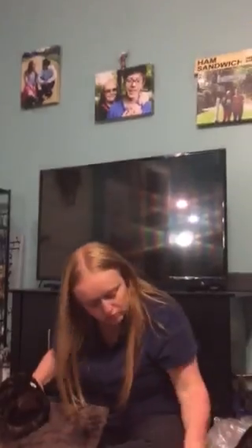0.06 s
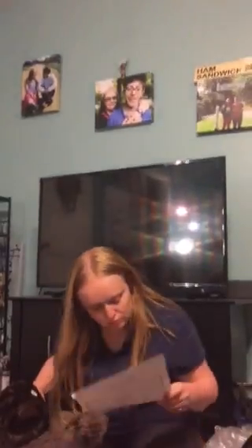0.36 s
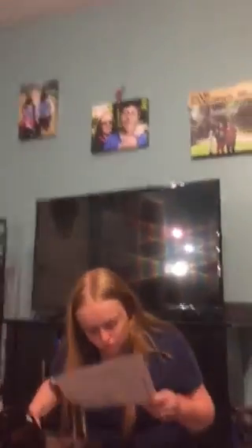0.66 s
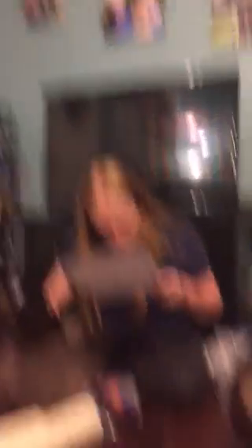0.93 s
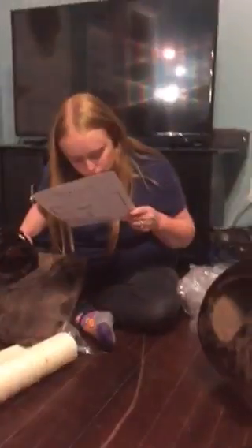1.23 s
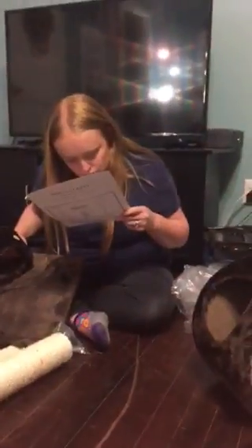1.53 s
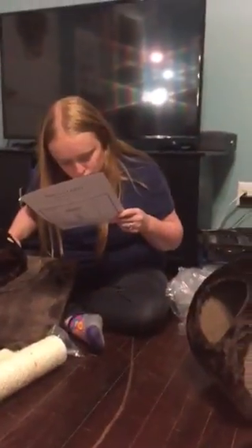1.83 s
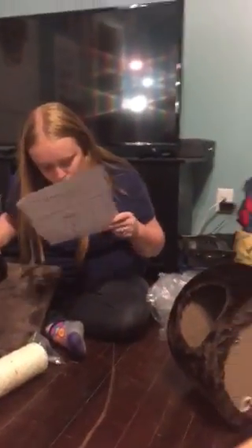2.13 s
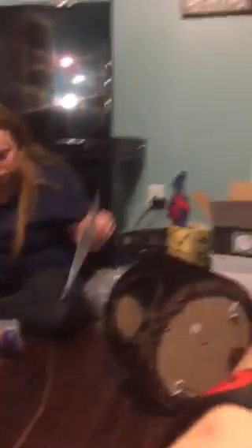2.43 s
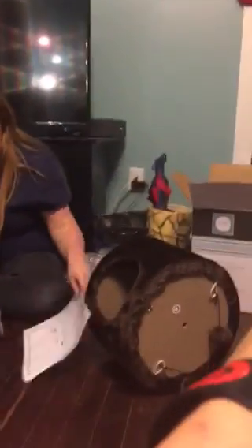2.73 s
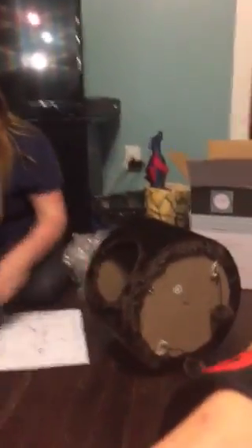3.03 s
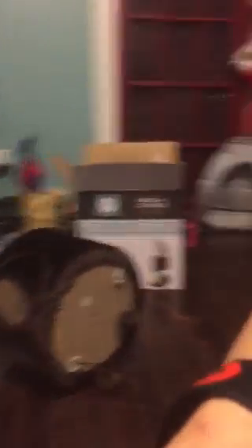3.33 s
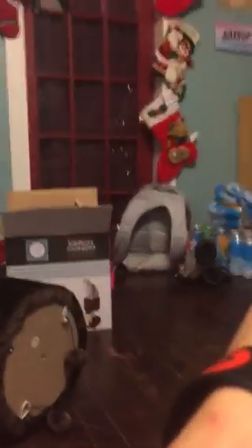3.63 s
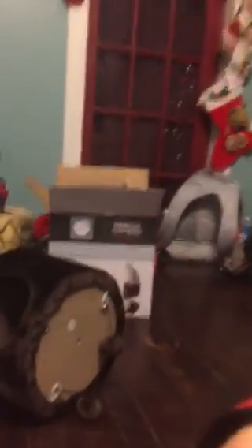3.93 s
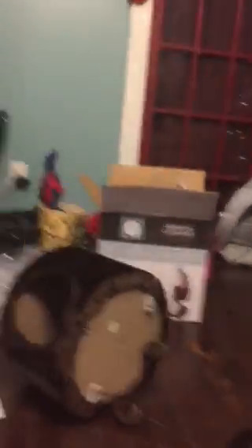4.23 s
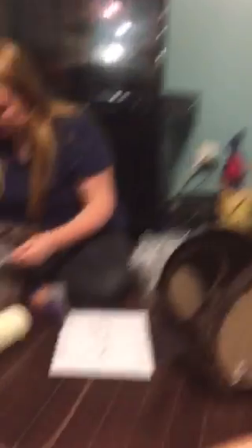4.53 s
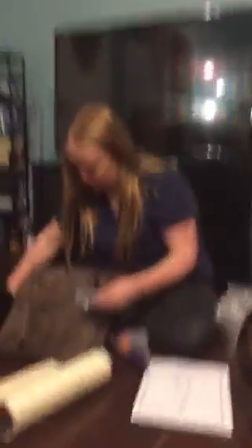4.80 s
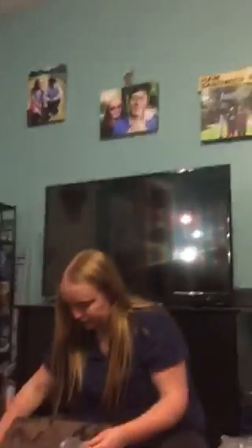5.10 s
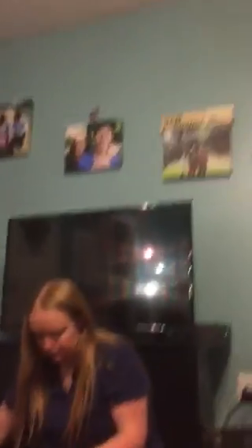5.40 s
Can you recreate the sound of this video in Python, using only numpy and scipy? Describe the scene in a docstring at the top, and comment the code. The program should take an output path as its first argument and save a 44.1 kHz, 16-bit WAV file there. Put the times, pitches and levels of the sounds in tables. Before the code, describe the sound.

A crisp rustle of paper opens, followed by soft carpet rubbing, small creaks and squeaks from a tight joint, and dull bumps of cat tower parts. Paper lands on the wooden floor, then a hand grabs a crackling plastic bag of screws. Several sharp ticks sound close to the microphone, the strongest together with a thump. A hard knock, low bumps and a last click follow, all in a small, quiet room with a short echo.

```python
"""In a small, fairly live room with a wooden floor, someone puts together a carpeted cat tower.
Its padded parts thump and rub, hard parts knock, and a tight joint creaks and squeaks as it sticks and slips.
A paper sheet is picked up, waved and dropped, and a plastic bag of screws is grabbed: both bend and crackle,
and the screws jingle. A few dry clicks and bumps come from right beside the microphone, over a quiet hush."""
import sys
import numpy as np
from scipy import signal
from scipy.fft import rfft, irfft, next_fast_len
from scipy.io import wavfile

SR = 44100
rng = np.random.default_rng(int(sys.argv[2]) if len(sys.argv) > 2 else 0)


def log_audio(samples):
    """Write samples as a 16-bit WAV file to the path given in sys.argv[1]."""
    # one column per channel
    frames = np.atleast_2d(samples).T
    # limit to full scale, then quantise
    limited = np.clip(frames, -1, 1)
    pcm = np.round(limited * 32767).astype(np.int16)
    wavfile.write(sys.argv[1], SR, pcm)


N = 249602
T = np.arange(N) / SR

# bumps of padded parts: (time [s], level [dB], pitch [Hz], room echo [dB])
THUMPS = [(1.197, -29, 308, -36), (2.175, -37.5, 202, -4.5), (2.422, -49.5, 155, 6),
          (3.173, -33.5, 195, -6.5), (3.193, -42.5, 224, 2), (3.353, -38.5, 294, -22),
          (3.492, -39.5, 91, 2), (3.964, -19, 214, -11.5), (3.9696, -20, 77.6, -12.5),
          (4.258, -31.5, 159, 1.5), (4.267, -47, 266, 3), (4.692, -46, 170, 0.5), (4.713, -43, 88, 0),
          (5.141, -27.5, 108, -4.5), (5.169, -41.5, 117, -4), (5.198, -42.5, 112, -10)]
# the tones in one bump: (multiple of the pitch [ratio], level [dB])
THUMP_TONES = [(.62, -7), (1.001, 0.5), (1.35, -6.5), (2.4, -30)]


def thumps(attack_s=0.0018, stiffening=0.15, relax_s=0.009, swings_to_fade=6.15, mic_low_hz=54):
    """Carpet softens a blow to a few low tones. Squeezed padding is stiffer: they start high and sag."""
    out, t = np.zeros(N), T[:SR // 2]
    sagging_time = t + stiffening * relax_s * (1 - np.exp(-t / relax_s))
    for s, db, hz, wet_db in THUMPS:
        swing = sum(amp(level) * np.sin(2 * np.pi * hz * ratio * sagging_time)
                    for ratio, level in THUMP_TONES)
        fade = amp(db - 60 * t * hz / swings_to_fade)  # low bumps last longer
        attack = 1 - np.exp(-t / attack_s)
        add(out, s, in_room(-swing * attack * fade, wet_db))
    mic_bass_cut = signal.butter(4, mic_low_hz, "high", fs=SR, output="sos")
    return signal.sosfilt(mic_bass_cut, out)


# hard parts meeting: (time [s], hit level [dB], room echo [dB], extra ring [dB])
KNOCKS = [(4.258, -42, -2, 6), (4.269, -34.5, -7.5, -4.5)]
# a board's tones at the hit, and those that ring on: (pitch [Hz], width [Hz], level [dB])
BOARD_HIT = [(410, 440, -5), (1040, 430, 16), (1860, 370, 11), (1930, 140, -8), (2700, 500, 3),
             (3340, 230, 11)]
BOARD_RING = [(1110, 67, 5.5), (1570, 110, -12), (1790, 320, 1.5), (2150, 31, 11.5)]


def knocks(muffle_hz=4300, ring_db=-5, ring_rise_s=0.0043, ring_t60=0.08):
    """A hard hit shakes a board. Its covering swallows the highs, and a free board rings on."""
    out, t = np.zeros(N), T[:SR // 4]
    covering = signal.butter(3, muffle_hz, fs=SR, output="sos")
    ring_shape = gesture(t, ring_rise_s, 0, 60 / ring_t60)
    for s, db, wet_db, extra_db in KNOCKS:
        push = contact(t60=0.019, scrape=0.37, size=len(t))
        hit = signal.sosfilt(covering, filtered(push, resonances(BOARD_HIT)))
        ring = filtered(rng.standard_normal(len(t)), resonances(BOARD_RING))
        ring = unit(signal.sosfilt(covering, ring))
        knock = hit / np.abs(hit).max() + amp(ring_db + extra_db) * ring * ring_shape
        add(out, s, in_room(amp(db) * knock, wet_db))
    return out


# strokes over carpet, cloth and paper:
# (time [s], length [s], level [dB], low edge [Hz], high edge [Hz], ringing pitch [Hz])
RUBS = [(0.107, 0.05, -51, 258, 1260, 780), (0.184, 0.035, -50, 202, 1370, 503),
        (0.209, 0.063, -50.5, 206, 1250, 750), (0.291, 0.077, -54.5, 864, 2800, 2510),
        (0.451, 0.0029, -47.5, 660, 1500, 940), (0.456, 0.048, -54, 225, 1050, 505),
        (0.87, 0.12, -63.5, 674.6, 4600, 3100), (1.03, 0.095, -55, 296, 5450, 1540),
        (1.546, 0.23, -76.5, 1170, 1350, 1230), (1.987, 0.039, -59.5, 920, 4800, 3120),
        (2.259, 0.13, -61.5, 457, 4980, 5100), (2.405, 0.03, -55, 556, 6800, 940),
        (2.426, 0.16, -61.5, 595, 5930, 920), (3.151, 0.046, -60.5, 1080, 2180, 1880),
        (4.116, 0.034, -56.5, 290, 1520, 1120), (4.285, 0.04, -55, 850, 3000, 2050),
        (5.155, 0.059, -66, 970, 4200, 2390), (5.605, 0.038, -65, 700, 1600, 890)]
# tones that all strokes share: (pitch [Hz], half width [Hz], strength [dB])
RUB_TONES = [(1110, 720, -2.5), (2800, 14, -38)]


def rubs(catch_db=-9, leak_db=-25, dull_hz=1800, ring_db=5, ring_width_share=0.048, rise_share=0.31):
    """Tiny fibres catch and slip, hissing with the rubbed part's tones. It fades once the hand stops."""
    out, t = np.zeros(N), T[:SR // 2]
    catches = crinkles(per_s=500, spread_db=-1.5)
    for s, length, db, low_hz, high_hz, ring_hz in RUBS:
        band = lambda f: (f / low_hz) ** 3 / np.sqrt((1 + (f / low_hz) ** 6) * (1 + (f / high_hz) ** 10))
        boost = emphasis(RUB_TONES + [(ring_hz, ring_width_share * ring_hz, ring_db)])
        colour = lambda f: (band(f) * boost(f) + amp(leak_db)) / np.sqrt(1 + (f / dull_hz) ** 2)
        slips = grains(len(t), per_s=306.6, spread_db=4)
        slips += amp(catch_db) * np.roll(catches, rng.integers(N))[:len(t)]
        stroke = amp(db) * gesture(t, rise_share * length, length, fade_db_per_s=465)
        add(out, s, in_room(stroke * unit(filtered(slips, colour)), wet_db=-10, bounce=FLOOR_BOUNCE))
    return out


# creaks of a tight joint: (time [s], length [s], level [dB], level of the low tones [dB])
CREAKS = [(0.679, 0.015, -63.5, -28), (1.048, 0.0021, -55, -10), (1.061, 0.004, -52, 2),
          (1.084, 0.0037, -50, 4), (1.098, 0.012, -51, -5), (1.179, 0.0014, -37, -3.5),
          (1.195, 0.032, -53, 4), (1.197, 0.0026, -41, 5), (1.207, 0.00098, -36, 1),
          (1.941, 0.0022, -52.5, -18), (2.05, 0.033, -53.5, -2), (2.126, 0.0019, -53.5, 2),
          (2.172, 0.01, -51.5, 0), (2.186, 0.013, -52, 9)]
# the joint's high and low tones: (pitch [Hz], width [Hz], level [dB])
JOINT_HIGH = [(1200, 374, 1.5), (1770, 330, -3), (2430, 320, -4.5), (3040, 320, -3.5), (4000, 320, -11)]
JOINT_LOW = [(295, 50, 5), (562, 85, 4.5)]


def creaks(slips_per_s=400, scrape=0.056, fade_db_per_s=2500):
    """A tight joint sticks and slips unevenly: a tick when short, a rasp when long."""
    out, t = np.zeros(N), T[:SR // 4]
    for s, length, db, low_db in CREAKS:
        slips = (rng.random(len(t)) < slips_per_s / SR) * rng.uniform(0.56, 1, len(t))
        slips += scrape * rng.standard_normal(len(t))
        slips[0] = 1
        push = slips * amp(-fade_db_per_s * np.maximum(t - length, 0))
        rasp = filtered(push, lambda f: resonances(JOINT_HIGH)(f) + amp(low_db) * resonances(JOINT_LOW)(f))
        rasp *= np.sqrt(length * SR) / np.linalg.norm(rasp)  # longer creaks carry more energy
        add(out, s, in_room(amp(db) * rasp, wet_db=-16))
    return out


# squeals of the joint: (time [s], length [s], level [dB], pitch [Hz])
SQUEAKS = [(0.681, 0.01, -57.5, 2750), (0.685, 0.015, -51.5, 1420), (0.77, 0.019, -61, 1260),
           (2.044, 0.043, -59, 2900), (2.071, 0.025, -54, 1250)]


def squeaks():
    """Now and then the slipping locks onto one tone of the joint and squeals briefly."""
    out, t = np.zeros(N), T[:SR // 8]
    for s, length, db, hz in SQUEAKS:
        squeal = unit(wavering(hz, width_hz=130, count=len(t)))
        swell = gesture(t, rise_s=0.013, length_s=length, fade_db_per_s=1500)
        add(out, s, in_room(amp(db) * squeal * swell, wet_db=-14))
    return out


def rustle(moves, colour, tones, bend_fade_db_per_s, crackle_fade_db_per_s, crinkle_db, wet_db):
    """Paper or plastic bends as a whole (lows), slides and crinkles (highs); the given tones stand out."""
    rise_s, split_hz = 0.014, 1500
    bend_level = np.max([amp(db) * gesture(T - s, rise_s, rise_s + hold, bend_fade_db_per_s)
                         for s, hold, db, _ in moves], axis=0)
    crackle_level = np.max([amp(db) * gesture(T - s, rise_s, rise_s + hold, crackle_fade_db_per_s)
                            for s, hold, _, db in moves], axis=0)
    low_share = lambda hz: 1 / (1 + (hz / split_hz) ** 8)
    gain = lambda hz: amp(along(colour, hz)) * emphasis(tones)(hz)
    bend = grains(N, per_s=270, spread_db=0.54)
    bend = unit(filtered(bend, lambda hz: gain(hz) * np.sqrt(low_share(hz))))
    crackle = grains(N, per_s=500, spread_db=3) + amp(crinkle_db) * crinkles(per_s=380, spread_db=1)
    crackle = unit(filtered(crackle, lambda hz: gain(hz) * np.sqrt(1 - low_share(hz))))
    return in_room(bend * bend_level + crackle * crackle_level, wet_db, FLOOR_BOUNCE)[:N]


# moves of the paper sheet: (time [s], hold [s], bending level [dB], crackle level [dB])
LIFT = [(-0.008, 0.043, -55.5, -44.5), (0.078, 0.014, -70, -46)]
WAVE = [(2.043, 0.019, -63.5, -63)]
DROP = [(2.822, 0.019, -37, -44.5), (2.913, 0.028, -55, -44.5), (3.076, 0.0072, -80, -55)]
# each move's mix of lows and highs: (frequency [Hz], relative level [dB])
LIFT_COLOUR = [(88, -28), (180, 2), (500, -4), (1040, -9), (1600, -2), (2100, -13), (2600, -4),
               (3400, -7.5), (4900, -10), (6390, -9.5), (16000, -33)]
WAVE_COLOUR = [(150, -6), (300, 8), (600, -27), (1300, -4), (3000, 10.5), (5000, 7), (10000, -0.5),
               (16000, -12)]
DROP_COLOUR = [(88, -47), (150, -28), (280, -13.5), (400, -16), (700, -9), (1360, -9.5), (2310, -9.5),
               (4200, -5), (8900, -15.5), (10400, -22), (12900, -20), (16000, -33)]
# tones that stand out as the sheet is lifted and dropped: (pitch [Hz], half width [Hz], strength [dB])
LIFT_RING = [(1900, 46, 6.5), (4150, 150, 7)]
DROP_RING = [(817, 29, -0.54), (1144, 42, 2), (1800, 150, -1)]


def paper_sheet():
    """The sheet rustles as it is picked up, waved and dropped."""
    lift = rustle(LIFT, LIFT_COLOUR, LIFT_RING,
                  bend_fade_db_per_s=197, crackle_fade_db_per_s=159, crinkle_db=-4, wet_db=-9)
    wave = rustle(WAVE, WAVE_COLOUR, [],
                  bend_fade_db_per_s=300, crackle_fade_db_per_s=175, crinkle_db=-18, wet_db=-3.5)
    drop = rustle(DROP, DROP_COLOUR, DROP_RING,
                  bend_fade_db_per_s=125, crackle_fade_db_per_s=138, crinkle_db=-4, wet_db=-10)
    return lift + wave + drop


# the paper's edge brushing the floor: (middle time [s], half length [s], level [dB])
SKIMS = [(0.025, 0.022, -49.5), (0.1, 0.025, -53), (3, 0.016, -51), (3.081, 0.0038, -43.5)]
# its mix of lows and highs: (frequency [Hz], relative level [dB])
SKIM_COLOUR = [(3000, -17.5), (8000, 1.5), (11000, -1.5), (13500, 5), (16000, -15)]


def paper_edge():
    """The sheet's edge skims over the floorboards with a thin, high hiss."""
    swell = sum(amp(db) * np.exp(-((T - s) / half_length) ** 2) for s, half_length, db in SKIMS)
    friction = grains(N, per_s=390, spread_db=4.4)
    return swell * unit(filtered(friction, lambda hz: amp(along(SKIM_COLOUR, hz))))


# squeezes of the bag: (time [s], hold [s], bending level [dB], crackle level [dB])
SQUEEZES = [(3.322, 0.028, -47, -55), (3.462, 0.03, -42, -42.5), (3.576, 0.073, -46, -46)]
# their mix of lows and highs: (frequency [Hz], relative level [dB])
BAG_COLOUR = [(88, -39), (150, -44), (209, -4), (504, -1), (612, -12), (702, -2), (1140, -1), (2400, 3.5),
              (2810, -1), (3620, 4), (9440, -15), (10600, -21), (16000, -23)]
# tones that stand out in the bag's rustle: (pitch [Hz], half width [Hz], strength [dB])
BAG_RING = [(674, 26, 1.4), (1170, 35, 1.6), (1638, 15, 1.8), (2190, 20, 0.7)]


def plastic_bag():
    """The thin plastic crinkles as a hand grabs it."""
    return rustle(SQUEEZES, BAG_COLOUR, BAG_RING,
                  bend_fade_db_per_s=154, crackle_fade_db_per_s=137, crinkle_db=1, wet_db=-7.5)


# creases in paper and plastic popping over: (time [s], peak level [dB], pitch [Hz])
SNAPS = [(0.006, -29.5, 3900), (0.052, -31, 1900), (0.057, -26.5, 4000), (0.101, -28, 6300),
         (0.125, -29.5, 6400), (0.18, -33, 4060), (2.826, -28, 4130), (2.84, -20, 4070), (2.844, -28, 900),
         (2.851, -30, 1150), (2.927, -35, 5900), (3.0795, -31.5, 3900), (3.092, -38, 2340),
         (3.332, -42, 1100), (3.344, -37.5, 1980), (3.367, -56, 1400), (3.45, -28.5, 1230),
         (3.458, -27, 3750), (3.466, -24.5, 1640), (3.475, -27, 2110), (3.486, -23, 4100),
         (3.493, -27.5, 2030), (3.592, -26, 2020), (3.607, -28.5, 2010), (3.6172, -23.5, 5700),
         (3.639, -25.5, 2240), (3.648, -27, 1156)]
# their mix of lows and highs: (frequency [Hz], relative level [dB])
SNAP_COLOUR = [(300, -45), (900, 19.5), (2000, 19), (4200, 12), (8000, 8.5), (16000, -5)]


def crease_snaps(ring_db=11, ring_width_share=0.053, low_cut_share=0.71):
    """A crease gives way with a crack. The flat patch beside it rings, with little below its pitch."""
    out = np.zeros(N)
    for s, db, hz in SNAPS:
        low_cut = signal.butter(2, low_cut_share * hz, "high", fs=SR, output="sos")
        crack = signal.fftconvolve(contact(t60=0.02, scrape=0.13), coloured_pulse(SNAP_COLOUR))
        crack = signal.sosfilt(low_cut, crack)
        crack += filtered(crack, resonances([(hz, ring_width_share * hz, ring_db)]))
        add(out, s, in_room(amp(db) * crack / np.abs(crack).max(), wet_db=-8))
    return out


# screws touching in the bag: (time [s], level [dB])
JINGLES = [(3.507, -43), (3.514, -52), (3.578, -48)]
# a screw's tones: (pitch [Hz], level [dB], time to fade by 60 dB [s])
SCREW_TONES = [(9350, 2, 0.075), (12960, -3, 0.04), (14000, -1, 0.079), (15440, -3, 0.045)]


def screws(smear_hz=110):
    """Small steel parts give a brief, very high, rough ring."""
    out, t = np.zeros(N), T[:SR // 4]
    for s, db in JINGLES:
        ring = sum(amp(level + rng.normal(0, 1.1) - 60 * t / t60) * wavering(hz, smear_hz, len(t))
                   for hz, level, t60 in SCREW_TONES)
        add(out, s, in_room(amp(db) * ring, wet_db=-8))
    return out


# clicks near the microphone: (time [s], peak level [dB], low edge [Hz], high edge [Hz], room echo [dB])
CLICKS = [(0.0158, -30, 8000, 15000, -16), (0.113, -33, 8000, 15000, -18), (3.7353, -31, 2390, 6600, -26),
          (3.8263, -38.5, 2280, 6800, -28), (3.868, -26, 1840, 11200, -8), (3.9, -38, 2440, 11500, -29),
          (3.9636, -24, 490, 1870, -13), (3.9656, -16, 5150, 10800, -25.5), (4.127, -48.5, 1670, 4500, 2),
          (5.4784, -30, 1760, 4450, -7.5), (5.479, -44, 9100, 14900, -22)]


def clicks():
    """Tiny hard contacts tick with no bass. Most are so close that the room hardly answers."""
    out = np.zeros(N)
    for s, db, low_hz, high_hz, wet_db in CLICKS:
        low_cut = signal.butter(5, low_hz, "high", fs=SR, output="sos")
        high_cut = signal.butter(2, high_hz, fs=SR, output="sos")
        tick = signal.sosfilt(np.vstack([low_cut, high_cut]), contact(t60=0.006, scrape=0.16))
        add(out, s, in_room(amp(db) * tick / np.abs(tick).max(), wet_db))
    return out


# how long the room rings: (frequency [Hz], time to fade by 60 dB [s])
ROOM_FADE = [(200, 0.25), (530, 0.41), (3700, 0.35), (12000, 0.28)]
FLOOR_BOUNCE = 0.22  # strength next to the direct sound


def in_room(x, wet_db, bounce=0, echoes=7):
    """Add a bounce off the floor, plus wall echoes and a fading wash whose level is set by wet_db."""
    hz, t, noise = signal.stft(rng.standard_normal(SR // 2), SR, nperseg=256)
    tail = signal.istft(noise * amp(-60 * t / along(ROOM_FADE, hz)[:, None]), SR, nperseg=256)[1]
    tail *= 1 - np.exp(-(T[:len(tail)] / 0.0019) ** 2)
    tail /= np.linalg.norm(tail)
    tail[(rng.uniform(.002, .025, echoes) * SR).astype(int)] += 0.22 * rng.standard_normal(echoes)
    response = amp(wet_db) * tail
    response[0] += 1  # the direct sound
    # the longer path over the floor makes a distant sound slightly hollow
    response[int(rng.uniform(.002, .004) * SR)] += bounce
    return signal.fftconvolve(x, response / np.hypot(1, bounce))


# the quiet room's mix of lows and highs: (frequency [Hz], relative level [dB])
HUSH_COLOUR = [(25, -32), (64, 2), (260, -6.5), (516, -11.5), (1020, -15), (1520, -16.5), (6920, -26.5),
               (16000, -34)]


def room_hush(level_db=-68.5):
    """The steady, soft noise of the room."""
    return amp(level_db) * unit(filtered(rng.standard_normal(N), lambda hz: amp(along(HUSH_COLOUR, hz))))


def gesture(t, rise_s, length_s, fade_db_per_s):
    """Loudness of a movement: it rises, holds until its length is over, then fades."""
    return np.clip(t / rise_s, 0, 1) * amp(-fade_db_per_s * np.maximum(t - length_s, 0))


def grains(count, per_s, spread_db):
    """Rubbing noise: many tiny slips, each of its own size."""
    slip_sizes = np.clip(rng.standard_normal(count + 2), -2, 2)
    sizes = np.interp(np.arange(count) * min(per_s / SR, 1), np.arange(count + 2), slip_sizes)
    return unit(rng.standard_normal(count) * amp(spread_db * sizes))


def crinkles(per_s, spread_db, octaves=6):
    """Tiny pops at random moments, each with its own mix of lows and highs."""
    moments = rng.random(N) < per_s / SR
    pops = moments * rng.standard_normal((octaves, N))
    pops *= amp(spread_db * np.clip(rng.standard_normal(N), -2, 1.5))
    octave = lambda k: lambda hz: np.clip(1 - np.abs(np.log2((hz + 1) / 500) - k), 0, 1)
    return unit(sum(filtered(pops[k], octave(k)) for k in range(octaves)))


def contact(t60, scrape, size=2048):
    """A sharp push, then a scrape that fades by 60 dB in t60 seconds."""
    burst = scrape * rng.standard_normal(size) * amp(-60 * T[:size] / t60)
    burst[0] += 1
    return burst


def wavering(hz, width_hz, count):
    """An unsteady tone, its pitch smeared over this width."""
    wander = np.cumsum(rng.standard_normal(count)) * np.sqrt(2 * np.pi * width_hz / SR)
    return np.sin(2 * np.pi * hz * T[:count] + wander)


def coloured_pulse(colour, size=1024):
    """A short pulse with this mix of lows and highs, silent before it strikes (minimum phase)."""
    cepstrum = irfft(np.log(amp(along(colour, np.fft.rfftfreq(size, 1 / SR)))))
    cepstrum[1:size // 2] *= 2
    cepstrum[size // 2 + 1:] = 0
    return irfft(np.exp(rfft(cepstrum)))


def resonances(tones):
    """A filter that rings at these tones: (pitch [Hz], width [Hz], level [dB])."""
    return lambda f: sum((-1) ** k * amp(db) * 1j * f * width / (hz * hz - f * f + 1j * f * width)
                         for k, (hz, width, db) in enumerate(tones))


def emphasis(tones):
    """A filter that passes everything and lifts these tones: (pitch [Hz], half width [Hz], strength [dB])."""
    return lambda f: 1 + sum(amp(db) / (1 + ((f - hz) / width) ** 2) for hz, width, db in tones)


def filtered(x, response):
    """Scale each frequency in x by response(frequency)."""
    size = next_fast_len(len(x) + 8192)
    return irfft(rfft(x, size) * response(np.fft.rfftfreq(size, 1 / SR)), size)[:len(x)]


def along(points, hz):
    """Read between (frequency [Hz], value) points on a log frequency scale."""
    freqs, values = np.transpose(points)
    return np.interp(np.log(hz + 1), np.log(freqs), values)


def amp(db):
    """Turn decibels into a multiplier."""
    return 10 ** (np.asarray(db) / 20)


def unit(x):
    """Scale to an average (rms) level of 1."""
    return x / np.sqrt(np.mean(x ** 2) + 1e-20)


def add(track, s, x):
    """Mix x into the track, starting at s seconds."""
    start = max(0, round(s * SR))
    track[start:start + len(x)] += x[:max(0, N - start)]


def scene():
    """Everything heard at one microphone."""
    small_things = paper_sheet() + paper_edge() + plastic_bag() + crease_snaps() + screws() + clicks()
    tower = creaks() + squeaks() + knocks() + thumps() + rubs()
    return (tower + small_things + room_hush())[None]


def record(dry, top_hz=15900):
    """Cut away the very highest treble."""
    return np.array([filtered(x, lambda hz: 1 / np.sqrt(1 + (hz / top_hz) ** 200)) for x in dry])


dry = scene()
out = record(dry)
log_audio(out)
```